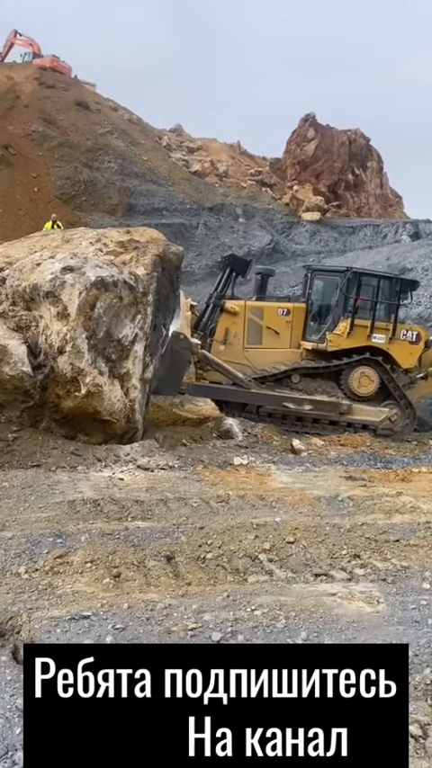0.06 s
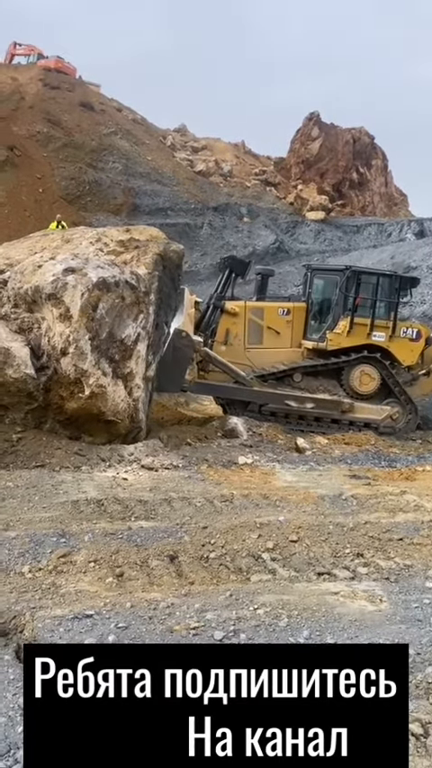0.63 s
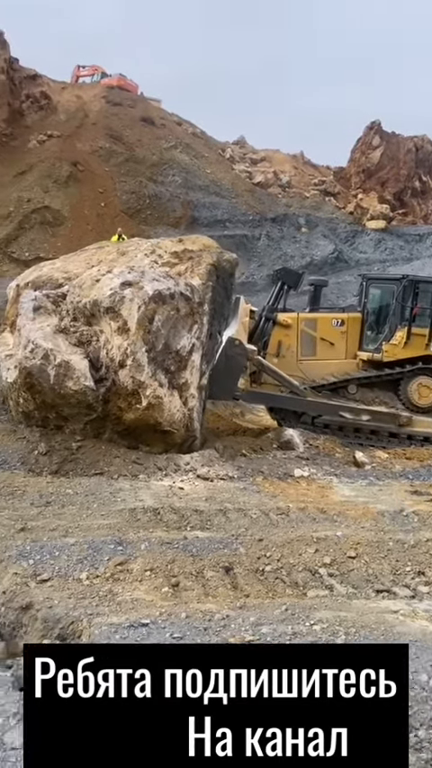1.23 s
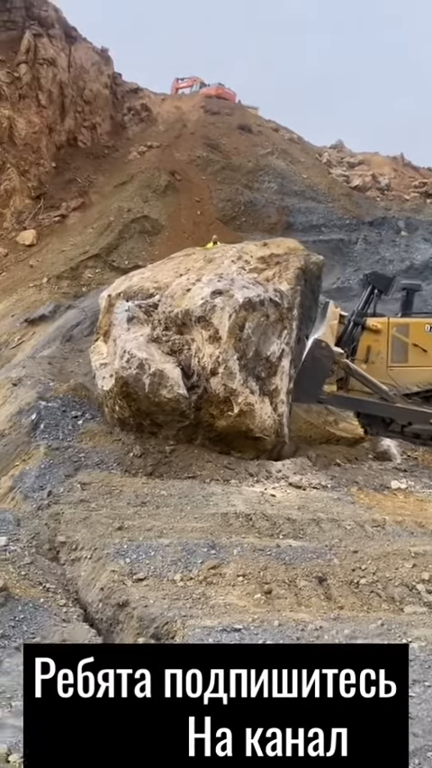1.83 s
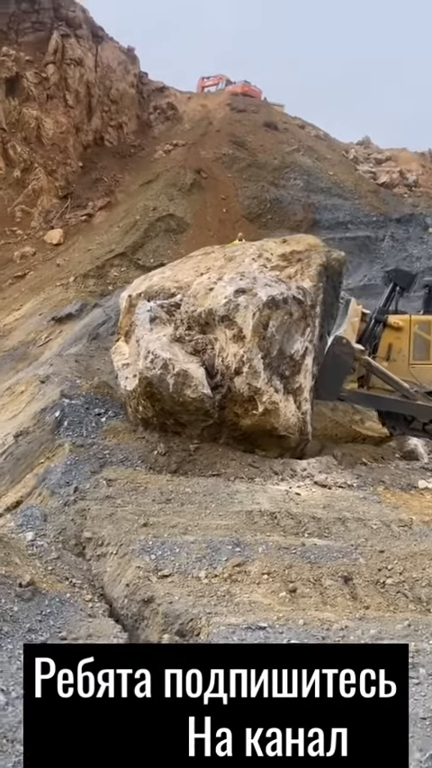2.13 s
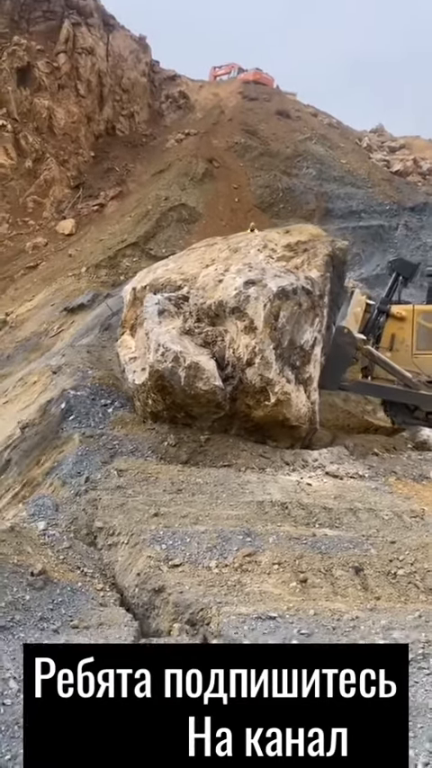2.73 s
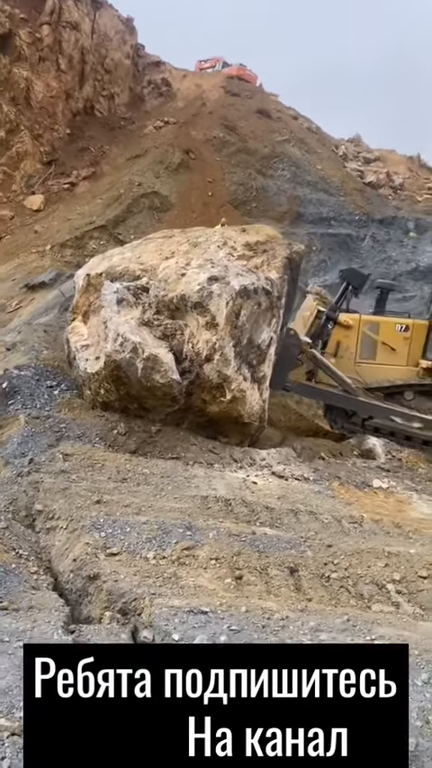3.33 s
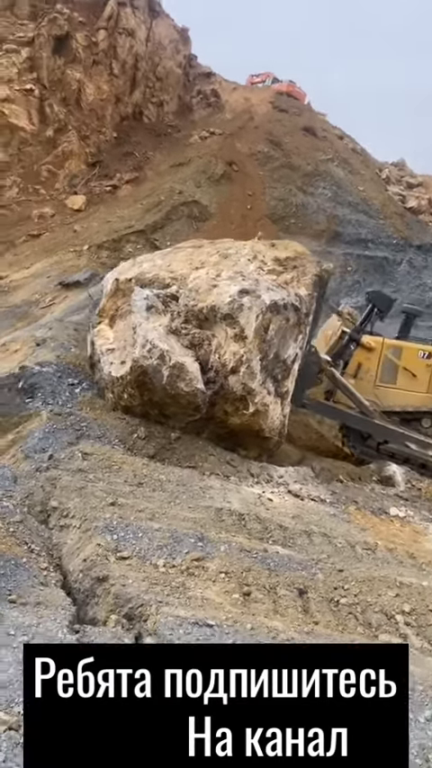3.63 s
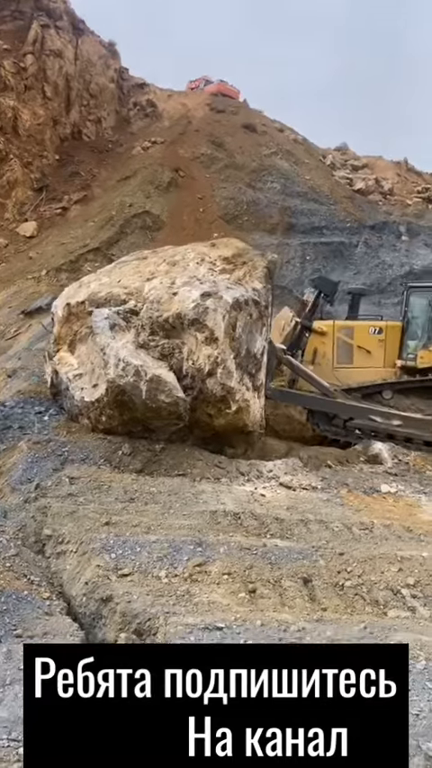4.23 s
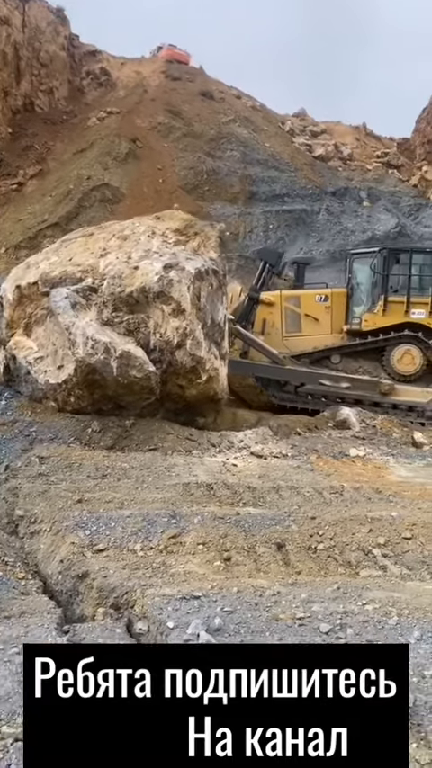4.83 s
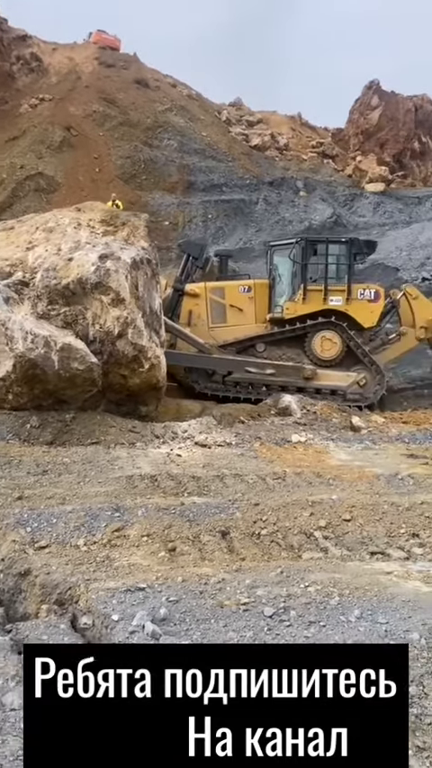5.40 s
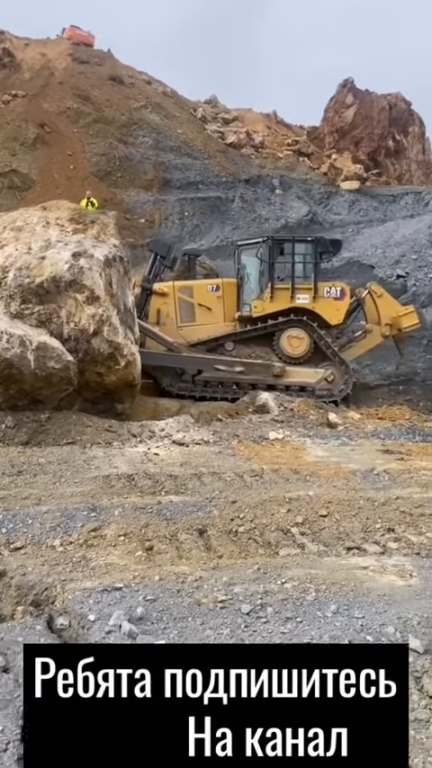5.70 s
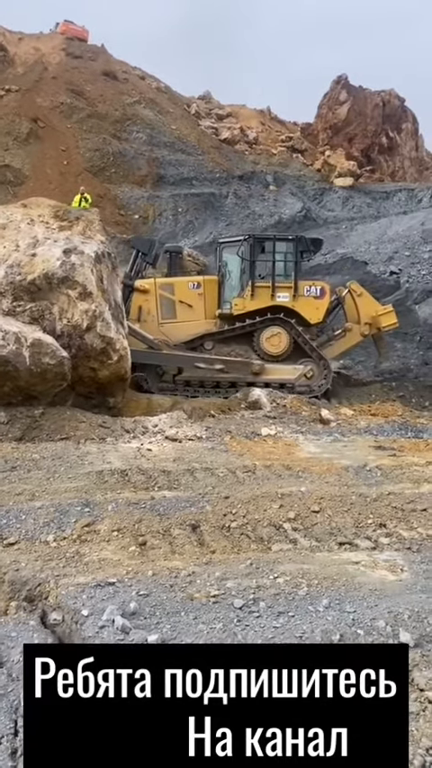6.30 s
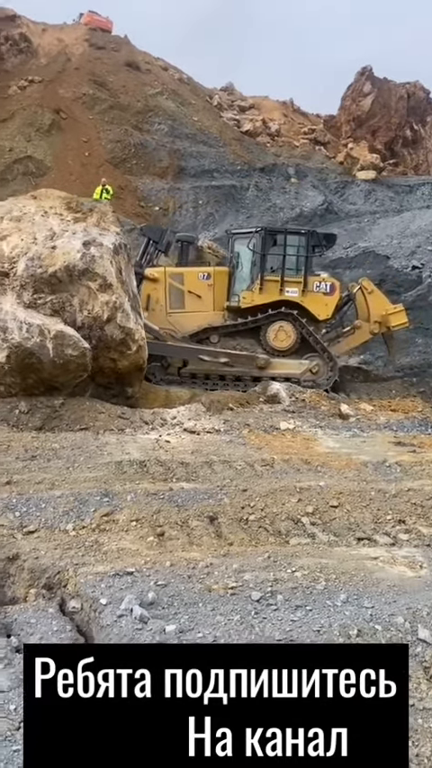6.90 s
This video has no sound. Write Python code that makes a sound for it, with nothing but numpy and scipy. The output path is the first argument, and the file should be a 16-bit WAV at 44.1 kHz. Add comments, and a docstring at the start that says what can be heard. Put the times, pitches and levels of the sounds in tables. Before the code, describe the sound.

A large diesel bulldozer shoves a boulder in a quarry, about twenty metres away, its pulsing drone, clatter and fan hiss running throughout. Over the first 1.8 seconds the engine revs up while slipping steel tracks grind gravel and crack stone in jerks, with sharp clanks around 1.3 and 1.7 seconds. From about 2 to 3 seconds the engine lugs and dips in pitch under a faint, breathy, rising turbo whistle, then climbs again. Dry track pins give short squeaks between 3.3 and 5.2 seconds. Two clanks and a brief crunch come around 4.6 to 4.8 seconds, alongside a very faint, thin high tone. A soft gear whine swells and falls from 5.2 to 6.3 seconds. The engine noise grows slightly louder, another squeak and crunch come at 6.5, and at 6.7 the machine lurches with a heavy double crash of steel and rock.

```python
"""A diesel drone and steel tracks slipping on rock: a large crawler tractor shoves a boulder across a
quarry floor, some twenty metres away. The six-cylinder engine revs up, its firings pulsing in exhaust,
rumble and clatter over fan and intake hiss; it lugs once, with a breathy, rising turbo whistle. The tracks
grind gravel, crack stone in stick-slip jerks and clank. Later dry pins squeak, a faint, thin tone sounds
near 11 kHz and the final drive whines. Near the end the machine lurches with a heavy crash."""
import sys
import numpy as np
from scipy import signal
from scipy.fft import rfft, irfft, next_fast_len
from scipy.io import wavfile

SR = 44100
rng = np.random.default_rng(int(sys.argv[2]) if len(sys.argv) > 2 else 0)


def master(y):
    """Save y as 16-bit WAV."""
    cut = np.clip(np.atleast_2d(y).T, -1, 1)
    pcm = np.round(cut * 32767)  # scale
    wavfile.write(sys.argv[1], SR, pcm.astype(np.int16))


N = 306495
TIME_S = np.arange(N) / SR
FFT_SIZE = next_fast_len(N + 4096, True)
BINS_HZ = np.maximum(np.arange(FFT_SIZE // 2 + 1) * SR / FFT_SIZE, 1)
PAN_SPLIT = np.array([[.5], [-.5]])  # half of a left-minus-right value to each side


def from_db(db):
    """Decibels to gain."""
    return 10 ** (np.asarray(db) / 20)


def unit_rms(x):
    """Scale to rms 1."""
    return x / np.sqrt(np.mean(x ** 2) + 1e-20)


def curve(points):
    """A (time, value) table at every sample."""
    return np.interp(TIME_S, *np.transpose(points))


def spectrum_at(points, hz=BINS_HZ):
    """A (frequency, value) table read on a log-frequency axis."""
    known_hz, value = np.transpose(points)
    return np.interp(np.log(hz), np.log(known_hz), value)


def after(start_s, length_s):
    """Sample span following an onset, and its age in seconds."""
    first = np.searchsorted(TIME_S, start_s, "right")
    span = slice(first, first + int(length_s * SR))
    return span, TIME_S[span] - start_s


def drift(rate_hz):
    """Smooth random wander, rms about 1."""
    hop, settle = 40, 2000
    pole = np.exp(-2 * np.pi * rate_hz * hop / SR)
    white = rng.standard_normal(N // hop + settle + 2)
    slow = signal.lfilter([1], [1, -2 * pole, pole * pole], white)[settle:]
    return np.interp(np.arange(N) / hop, np.arange(len(slow)), unit_rms(slow))


# Left-right likeness of noise: (frequency [Hz], coherence [0-1])
COHERENCE = [(300, 1), (600, 0.84), (1260, 0.9), (2700, 1), (9000, .8)]

def noise(spectrum, drive=1):
    """Coloured stereo noise, its excitation weighted by drive; rms 1."""
    mid, side = rfft(rng.standard_normal((2, N)) * drive, FFT_SIZE)
    coherence = np.clip(spectrum_at(COHERENCE), 0, 1)
    pair = np.sqrt(1 + coherence) * mid + np.sqrt(1 - coherence) * side * [[1], [-1]]
    skirts = np.minimum(BINS_HZ / spectrum[0][0], 1) ** 2 * np.minimum(spectrum[-1][0] / BINS_HZ, 1) ** 3
    return unit_rms(irfft(pair * from_db(spectrum_at(spectrum)) * skirts, FFT_SIZE)[:, :N])


def lugging(start_s=1.74, attack_s=0.21, hold_s=0.35, release_s=1):
    """Engine load, 0-1: the boulder resists once."""
    return np.interp(TIME_S, start_s + np.cumsum([0, attack_s, hold_s, release_s]), [0, 1, 1, 0])


def spool_slack(start_s=0.81, spool_s=1):
    """Share of the turbo's speed rise still to come, 1 towards 0."""
    return np.exp(-np.maximum(TIME_S - start_s, 0) / spool_s)


# Silencer response: (frequency [Hz], level [dB])
SILENCER_DB = [(59.5, -19.5), (64, -22.5), (69, -19), (75, -18.5), (80, -20.5), (85, -19.5), (118, -34.5),
               (150, -36), (172, -28), (192, -17.5), (213, -31.5), (225, -21), (244, -16), (258, -18.5)]
# Drone balance near the main pipe resonance: (frequency [Hz], left minus right [dB])
DRONE_PAN_DB = [(218, 1.5), (235, -1.5), (243, -2), (256, 2)]
# Weak engine orders, thirds from unequal cylinders: (multiple of firing rate [ratio], level [dB])
WEAK_ORDERS = [(7 / 3, -44.5), (8 / 3, -40.5), (10 / 3, -44), (11 / 3, -48), (4, -36.5), (13 / 3, -46),
               (16 / 3, -47), (6, -44), (19 / 3, -44), (7, -43), (23 / 3, -50)]
# Exhaust pipe resonances: (frequency [Hz], gain [dB])
PIPE_DB = [(150, -24), (240, 3), (305, -2.5), (350, -3.5), (410, -2), (470, -5.5), (520, 0), (590, -5),
           (700, -12)]

def exhaust(firing_hz, angle, lug, wobble_db=0.53, uneven_db=1.05, unboosted_db=-15, growl_db=4.5):
    """Firing pulses: three harmonics shaped by the silencer, weak orders by the pipe and the load."""
    drone = np.zeros((2, N))
    for harmonic in (1, 2, 3):
        hz = harmonic * firing_hz
        level_db = spectrum_at(SILENCER_DB, hz) + spectrum_at(DRONE_PAN_DB, hz) * PAN_SPLIT
        if harmonic == 3:  # held back until the turbo spools up
            level_db += unboosted_db * spool_slack()
        drone -= from_db(level_db + wobble_db * drift(16.4)) * np.cos(harmonic * angle)
    for order, db in WEAK_ORDERS:
        jitter_rad = .12 + .11 * order * (1 - lug) ** 2  # high orders smear unless the engine lugs
        phase = order * angle + rng.uniform(0, 2 * np.pi) + jitter_rad * drift(8.9)
        level_db = db + growl_db * lug + spectrum_at(PIPE_DB, order * firing_hz)
        drone += from_db(level_db + uneven_db * drift(3.6)) * np.cos(phase)
    return np.sqrt(2) * drone


# Gas rumble, combustion clatter, fan and intake hiss: (frequency [Hz], relative density [dB])
RUMBLE_SPECTRUM = [(25, -18), (45, 0), (65, 6.5), (110, 7.5), (190, 2), (290, 2.5), (420, -5.5), (550, 1.5),
                   (680, -18.5), (1000, -58)]
CLATTER_SPECTRUM = [(450, -14), (700, 7.5), (1050, 6.5), (1250, -3.5), (1450, -3), (1700, 0), (2100, 3),
                    (2600, -1), (3100, -1.5), (3500, -14), (4500, -11)]
HISS_SPECTRUM = [(2500, 8), (3800, 3.5), (4500, 4.5), (5700, 8), (7000, 2.5), (9000, -1.5), (11100, -5),
                 (11900, -43)]
# Their level laws: (level at working speed [dB], speed slope [dB/octave], gain at full lug [dB])
RUMBLE_LAW_DB = (-30.5, 3.8, -0.4)
CLATTER_LAW_DB = (-38.5, 10.8, 0.15)
HISS_LAW_DB = (-45, 7.8, 5.7)
# Engine noise grows as the machine draws level: (time [s], gain [dB])
APPROACH_DB = [(0, 1), (4.3, -0.47), (5.3, 1), (6.3, 2.5), (6.95, 4)]

def engine_noise(firing_hz, angle, lug, working_hz=80, throb_db=2.0, knock_db=0.5):
    """Rumble and clatter swell at each firing; the hiss does not pulse. All rise with speed."""
    octaves = np.log2(firing_hz / working_hz)
    rumble_db, clatter_db, hiss_db = [
        db + db_per_octave * octaves + lug_db * lug + curve(APPROACH_DB)
        for db, db_per_octave, lug_db in (RUMBLE_LAW_DB, CLATTER_LAW_DB, HISS_LAW_DB)]
    firing = np.cos(angle)
    rumble = from_db(rumble_db) * noise(RUMBLE_SPECTRUM, from_db(throb_db * firing))
    clatter = from_db(clatter_db) * noise(CLATTER_SPECTRUM, from_db(knock_db * firing))
    return rumble + clatter + from_db(hiss_db) * noise(HISS_SPECTRUM)


# Long track slides: (time [s], hold [s], level [dB])
SLIDES = [(0.0, 0.15, -36), (0.676, 0.078, -32), (0.959, 0.33, -26.5), (1.713, 0.12, -33),
          (6.697, 0.074, -23)]
# Crushed gravel: (frequency [Hz], relative density [dB])
GRAVEL_SPECTRUM = [(170, 1.5), (280, 10.5), (480, -5), (610, 7.5), (730, -8), (900, -2.5), (1400, -6.5),
                   (1700, -2.5), (3050, -6), (3700, -16), (5500, -13), (9000, -35)]

def grinding(attack_s=0.036, release_s=0.043, grain_db=1.0):
    """Gravel grinds without a break under a sliding track."""
    pressure = np.zeros(N)
    for start_s, hold_s, db in SLIDES:
        corners_s = start_s + np.cumsum([0, attack_s, hold_s, release_s])
        pressure += from_db(db) * np.interp(TIME_S, corners_s, [0, 1, 1, 0])
    return pressure * noise(GRAVEL_SPECTRUM, from_db(grain_db * drift(500)))


# Tracks slip on rock: (time [s], length [s], crunch [dB], thud [dB], splinter [dB], rubble t60 [s])
TRACK_SLIPS = [(.005, 0.049, -33, -23.5, -41, .45), (0.066, 0.036, -36.5, -24.5, -43, 0.43),
               (0.21, 0.053, -39, -22.5, -40.5, 0.29), (0.661, 0.051, -30, -29.5, -30.5, 0.37),
               (0.958, .11, -29, -27, -29, 0.51), (1.114, 0.0072, -34, -43, -30.5, .3),
               (1.162, 0.011, -30.5, -27, -32.5, 0.36), (1.207, 0.064, -27, -25, -27, 0.4),
               (1.316, 0.023, -24, -30, -28, 0.39), (1.522, 0.076, -26.5, -29.5, -29.5, 0.5),
               (1.673, 0.033, -22.5, -28, -23.5, 0.45), (4.616, 0, -33, -34, -38, 0.079),
               (4.774, 0, -34, -44, -34, .09), (4.815, 0.03, -33.5, -27.5, -36, 0.36),
               (6.489, 0.18, -34, -34, -41, 0.44), (6.696, 0.033, -20.5, -17, -47, 0.3),
               (6.743, 0.022, -19.5, -29, -44, 0.25), (6.891, 0.026, -27.5, -31, -35, 0.46)]

def stick_slip(gap_s=.03, scatter_s=.005, snap_below_s=.004, sliding_db=-5, build_db_per_s=10):
    """A lone snap, or a breakaway then softer jerks that build; rows as TRACK_SLIPS without length."""
    jerks = []
    for start_s, length_s, *levels_db, t60_s in TRACK_SLIPS:
        jerks.append((start_s, *levels_db, t60_s))
        if length_s < snap_below_s:
            continue
        count = max(1, round(length_s / gap_s))
        for delay_s in np.linspace(0, length_s, 1 + count)[1:]:
            jerk_s = start_s + delay_s + rng.normal() * min(scatter_s, delay_s / 10)
            force_db = sliding_db + build_db_per_s * delay_s + 1.5 * rng.uniform(-1.8, 1)
            jerks.append((jerk_s, *(np.array(levels_db) + force_db), t60_s))
    return jerks


# Crushed rock, frame thud, flying splinters: (frequency [Hz], relative density [dB])
CRUNCH_SPECTRUM = [(380, -3), (560, -2), (700, -3.5), (1170, 2.5), (1380, -10.5), (1700, -2.5), (3090, 0.5),
                   (3550, -11), (4060, -10.5), (5920, -16), (8640, -21.5), (13000, -58)]
THUD_SPECTRUM = [(40, -25), (90, -3), (160, -18), (260, -9), (450, -10.5), (700, -17), (1100, -11),
                 (1500, -31), (2500, -56)]
SPLINTER_SPECTRUM = [(1500, -19), (3600, -16), (4500, -0.5), (5900, 7), (7000, 0), (9000, -3.5),
                     (11300, -12), (13000, -25)]

def rock_crush(jerks, crack_db=-2, crack_s=0.0013, thud_rise_s=0.0094, clump_db=1.5, crackle_db=0.5):
    """Each jerk cracks rock into a dying burst of clumped grains, with a thud and a spray of splinters."""
    power = np.zeros((3, N))
    t60_share = np.array([[1], [1], [0.55]])  # splinters die sooner
    for start_s, crunch_db, thud_db, splinter_db, t60_s in jerks:
        span, age_s = after(start_s, 1)
        crack = np.sqrt(1 + from_db(crack_db) * np.exp(-age_s / crack_s))
        heave = 1 - np.exp(-age_s / thud_rise_s)  # the heavy frame responds later
        attack = from_db([[crunch_db], [thud_db], [splinter_db]]) * np.array([crack, heave, crack])
        decay = from_db(-60 * age_s / (t60_s * t60_share))
        power[:, span] += (attack * decay) ** 2
    crunch, thud, splinter = np.sqrt(power)
    grains = from_db(drift(460) + clump_db * drift(24))
    rubble = crunch * noise(CRUNCH_SPECTRUM, grains) + thud * noise(THUD_SPECTRUM)
    return rubble + splinter * noise(SPLINTER_SPECTRUM, grains * from_db(crackle_db * drift(900)))


# Track shoe modes: (frequency [Hz], gain [dB], t60 [s])
SHOE_MODES = [(834, -16, .2), (1640, -15, .12), (1970, -16, .1), (2590, -15, .06), (3012, -14, .05)]

def shoe_ring(force, ring_db=-6):
    """The crushing force rings the steel track shoes."""
    ring = np.zeros_like(force)
    for hz, db, t60_s in SHOE_MODES:
        pole, step_rad = from_db(-60 / (t60_s * SR)), 2 * np.pi * hz / SR
        feedback = [1, -2 * pole * np.cos(step_rad), pole * pole]
        mode = signal.lfilter([0, np.sin(step_rad)], feedback, force + 1e-18)
        ring += from_db(db) * np.sqrt(1 - pole * pole) * mode
    return from_db(ring_db) * ring


def stones(jerks, stone_db=-5.5, ring_cycles=350, low_hz=1500, high_hz=6500, count=9, spread_s=.02):
    """Pieces break off in turn and ring at their own pitches; higher ones are weaker and shorter."""
    out = np.zeros((2, N))
    for start_s, crunch_db, *_, t60_s in jerks:
        span, age_s = after(start_s, .5)
        for pitch, delay, lean in rng.random((count, 3)):
            hz = low_hz * (high_hz / low_hz) ** pitch
            since_s = np.maximum(age_s - spread_s * delay, 0)
            decay = from_db(-60 * since_s / min(ring_cycles / hz, t60_s))
            gain = from_db(crunch_db + stone_db) * np.sqrt(low_hz / hz)
            pan = np.array([[.5 + lean], [1.5 - lean]])
            out[:, span] += gain * pan * decay * np.sin(2 * np.pi * hz * since_s)
    return out


# Heavy blows, the last two being the crash: (time [s], frequency [Hz], level [dB], t60 [s])
FRAME_BLOWS = [(.005, 417.4, -24, 0.76), (.005, 753, -26.5, 0.31), (1.682, 419, -23, 1),
               (6.698, 168.6, -1.5, 0.097), (6.748, 92.7, -7, 0.23)]

def frame_thumps(rise_s=0.0059):
    """Each blow sets the frame or blade swinging at one low pitch."""
    out = np.zeros(N)
    for start_s, hz, db, t60_s in FRAME_BLOWS:
        age_s = np.maximum(TIME_S - start_s, 0)
        envelope = from_db(db - 60 * age_s / t60_s) * (1 - np.exp(-age_s / rise_s))
        out -= envelope * np.sin(2 * np.pi * hz * age_s)
    return out


# Steel-on-steel tick: (frequency [Hz], relative density [dB])
TICK_SPECTRUM = [(450, 6), (850, -4), (1400, -8), (2400, -2), (3700, -5), (5000, -10), (9000, -14)]
# Link impacts: (time [s], main ring [Hz], level [dB], t60 [s])
LINK_DROPS = [(.075, 2510, -33, 0.3), (.225, 2420, -34, .2), (.309, 2467, -32, .2),
              (1.317, 1638, -20, 0.35), (1.679, 2950, -20.5, 0.18), (4.616, 2480, -23, 0.056),
              (4.773, 2320, -24.5, 0.082), (6.719, 2346, -20, 0.1), (6.754, 1950, -22, 0.078)]
# Link modes: (multiple of main ring [ratio], gain [dB])
LINK_PARTIALS = [(0.348, -7), (0.482, -11), (0.997, -1), (1.09, -8), (1.239, -11.5), (1.53, -11.5),
                 (1.9, -16)]

def link_clanks(tick_db=-5, tick_t60_s=0.061, rattle_rad=0.68, uneven_db=1.5):
    """A track link drops home: a hard tick, then a short, rattling ring."""
    out, tick = np.zeros((2, N)), noise(TICK_SPECTRUM)
    for start_s, hz, db, t60_s in LINK_DROPS:
        span, age_s = after(start_s, .5)
        out[:, span] += from_db(db + tick_db - 60 * age_s / tick_t60_s) * tick[:, span]
        for ratio, mode_db in LINK_PARTIALS:
            phase = 2 * np.pi * ratio * hz * age_s + rattle_rad * drift(81)[span]
            level_db = db + mode_db - uneven_db * rng.normal()
            out[:, span] += from_db(level_db - 60 * age_s / t60_s) * np.sin(phase)
    return out


def rough_tone(hz, db, half_width_hz):
    """A narrow noise band following a pitch curve."""
    phase = 2 * np.pi * np.cumsum(hz) / SR
    lowpass = signal.butter(4, half_width_hz, fs=SR, output="sos")
    in_phase, quadrature = unit_rms(signal.sosfilt(lowpass, rng.standard_normal((2, N))))
    return from_db(db) * (in_phase * np.cos(phase) + quadrature * np.sin(phase))


# Breathy whistle, then a faint, thin tone: (time [s], level [dB])
HIGH_TONE_DB = [(1.8, -64), (2.05, -54), (2.7, -49), (2.9, -52), (3.05, -62), (4.45, -60), (4.7, -54),
                (5, -55), (5.3, -72)]

def high_tone(lug, start_hz=7460, top_hz=11250, waver_db=1.5):
    """A breathy, rising whistle while the engine lugs; later a faint, thin tone near 11 kHz."""
    hz = top_hz - (top_hz - start_hz) * spool_slack()
    db = curve(HIGH_TONE_DB) + waver_db * drift(3.5)
    breathy = rough_tone(hz, db, half_width_hz=550)
    thin = rough_tone(hz, db, half_width_hz=100)
    return np.sqrt(lug) * breathy + np.sqrt(1 - lug) * thin


# Dry track pins: (time [s], length [s], start pitch [Hz], end pitch [Hz], level [dB])
PIN_TURNS = [(3.32, 0.18, 2530, 2490, -47), (3.622, 0.04, 2790, 2880, -41), (3.768, .11, 3150, 3140, -46),
             (4.17, .06, 2840, 2850, -44), (4.245, .12, 2830, 2805, -43), (4.625, .21, 2062, 2017, -42),
             (5.118, 0.08, 2900, 3065, -33), (5.19, .04, 3080, 2930, -38.5), (6.45, .22, 2088, 2046, -36.5)]

def pin_squeaks(rasp_db=2.5, waver_hz=24, scrape_rad=.6, give_at=0.36, give_share=0.098):
    """A pin scrapes out a rough note as its link turns; the pitch slides over as the pin gives."""
    out = np.zeros(N)
    rasp = from_db(rasp_db * drift(68.5))
    waver = waver_hz * drift(100)
    scrape = scrape_rad * drift(200)
    for start_s, length_s, start_hz, end_hz, db in PIN_TURNS:
        turn = np.clip((TIME_S - start_s) / length_s, 0, 1)
        give = (1 + np.tanh((turn - give_at) / give_share)) / 2
        hz = start_hz + (end_hz - start_hz) * give + waver
        out += from_db(db) * np.sin(np.pi * turn) * np.sin(2 * np.pi * np.cumsum(hz) / SR + scrape)
    return np.sqrt(2) * rasp * out


def gear_whine(start_s=5.2, length_s=1.15, start_hz=1070, end_hz=960, level_db=-42):
    """The final drive swells and fades, its pitch falling as the tracks slow."""
    progress = np.clip((TIME_S - start_s) / length_s, 0, 1)
    hz = start_hz + (end_hz - start_hz) * progress
    return np.sin(np.pi * progress) * rough_tone(hz, level_db, half_width_hz=18)


def reflections(direct, earliest_s=0.002004, latest_s=.04, echo_db=-15, stereo_lag_s=.00035, count=10):
    """Ground, blade and boulder add quick echoes whose paths change as the machine creeps."""
    out, gain = direct.copy(), from_db(echo_db)
    delays_s = rng.uniform(earliest_s, latest_s, count)
    creeps = rng.normal(0, 1e-4, count)
    for delay_s, creep, lean in zip(delays_s, creeps, np.linspace(-1, 1, count)):
        path_s = delay_s + creep * TIME_S + lean * stereo_lag_s * PAN_SPLIT
        for side in (0, 1):
            out[side] += gain * np.interp(TIME_S - path_s[side], TIME_S, direct[side], left=0)
    return out / np.sqrt(1 + count * gain ** 2)


# Engine speed: (time [s], firing rate [Hz])
FIRING_HZ = [(0, 58.2), (.9, 59.7), (1.28, 67.6), (1.45, 72.8), (1.8, 80.5), (2, 77.4), (2.25, 74.8),
             (2.55, 74), (2.85, 75.2), (3.1, 78.5), (3.4, 78.4), (4.25, 80.9), (4.8, 84.9), (5.35, 86.2),
             (6.15, 84), (6.75, 86.1)]

def scene():
    """Speed and load drive the engine; the slipping tracks break rock under it."""
    firing_hz = curve(FIRING_HZ)
    angle = 2 * np.pi * np.cumsum(firing_hz) / SR  # one turn per firing
    lug, jerks = lugging(), stick_slip()
    tones = gear_whine() + high_tone(lug) + pin_squeaks()
    crush = rock_crush(jerks)
    tracks = crush + shoe_ring(crush) + stones(jerks) + grinding() + link_clanks()
    drone = exhaust(firing_hz, angle, lug)
    return drone + reflections(engine_noise(firing_hz, angle, lug) + tracks) + frame_thumps() + tones


# Stereo colouring: (frequency [Hz], left minus right [dB])
STEREO_TILT_DB = [(250, -3), (450, -1.5), (750, -3), (1250, -9.5), (2000, -2.5), (2500, -4), (3000, -12),
                  (3500, -5), (4500, -7), (6600, 0)]

def record(dry, ceiling=.88, cutoff_hz=12900):
    """Each microphone colours its side; the highest peaks are rounded and the top is cut."""
    sides = from_db(spectrum_at(STEREO_TILT_DB) * PAN_SPLIT)
    coloured = irfft(rfft(dry, FFT_SIZE) * sides / sides.mean(axis=0), FFT_SIZE)[:, :N]
    rounded = coloured / (1 + (coloured / ceiling) ** 8) ** (1 / 8)
    lowpass = signal.ellip(10, .3, 70, cutoff_hz, fs=SR, output="sos")
    return signal.sosfilt(lowpass, rounded)


dry = scene()
out = record(dry)
master(out)
```